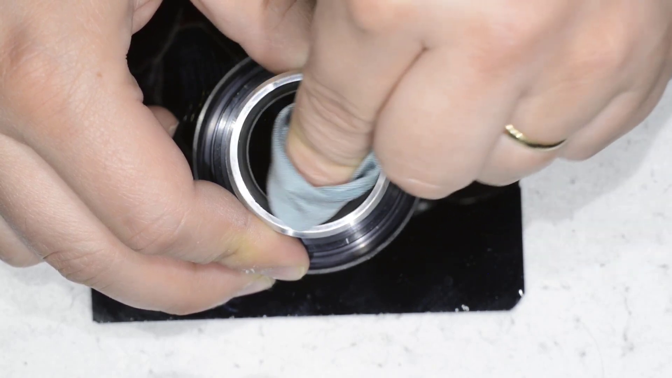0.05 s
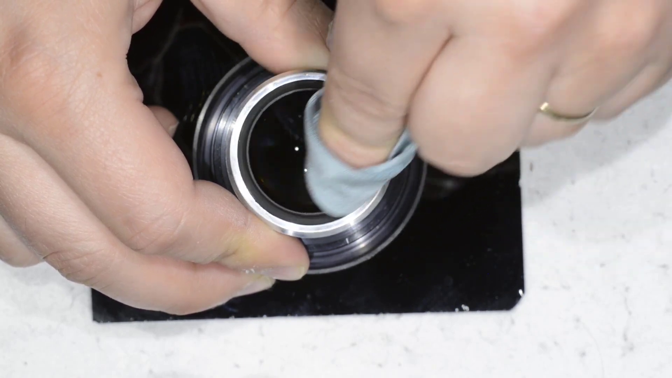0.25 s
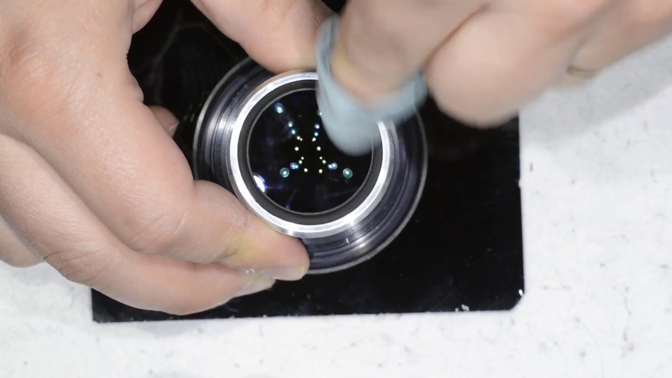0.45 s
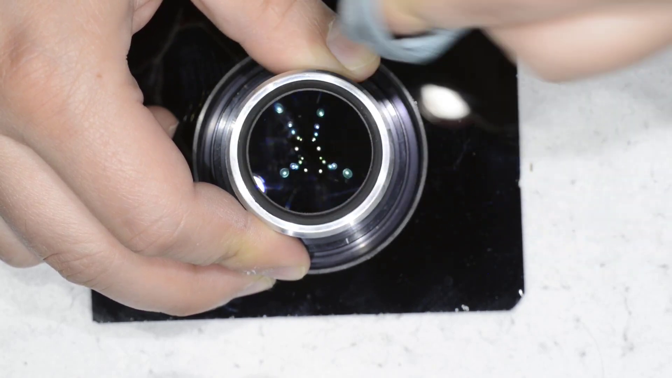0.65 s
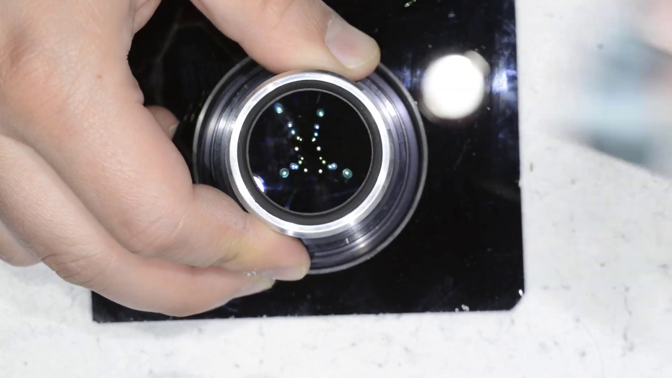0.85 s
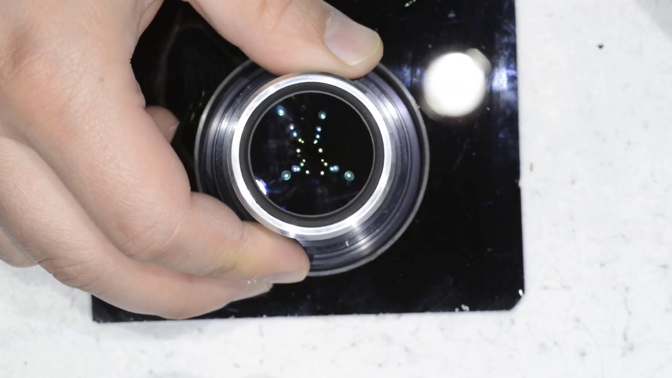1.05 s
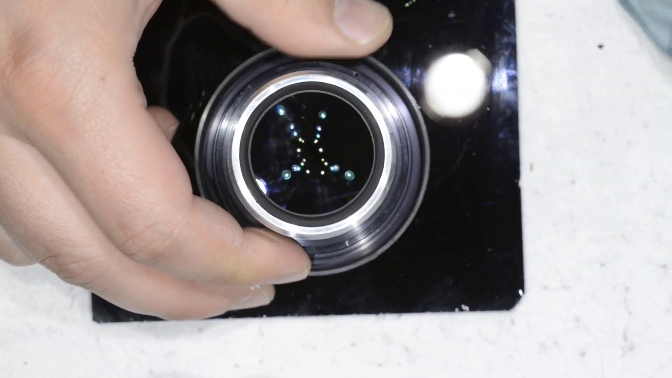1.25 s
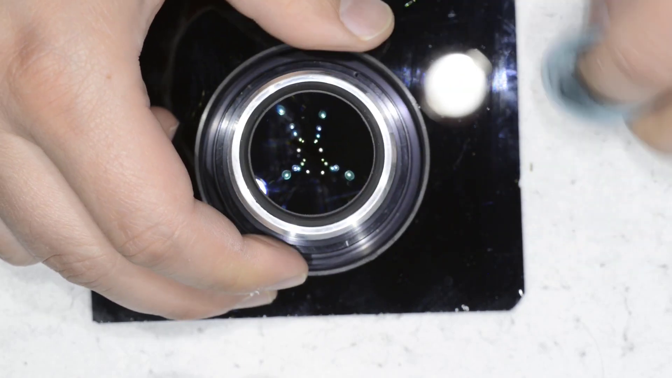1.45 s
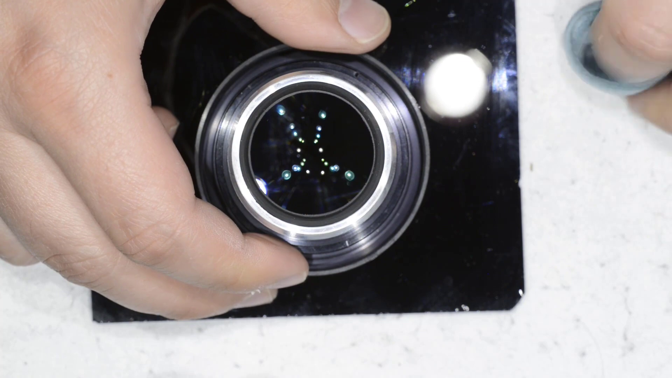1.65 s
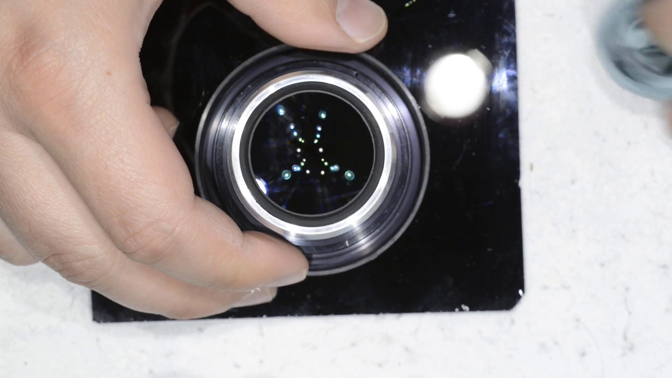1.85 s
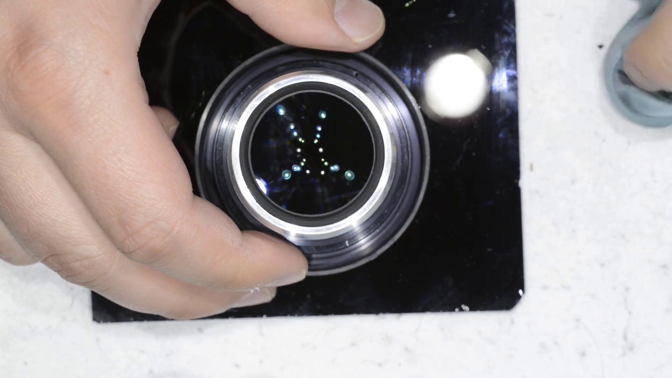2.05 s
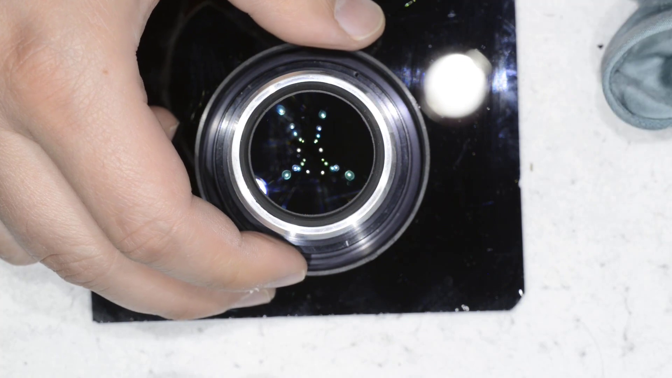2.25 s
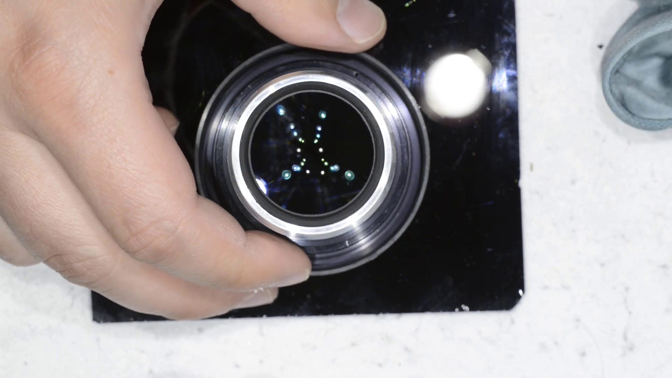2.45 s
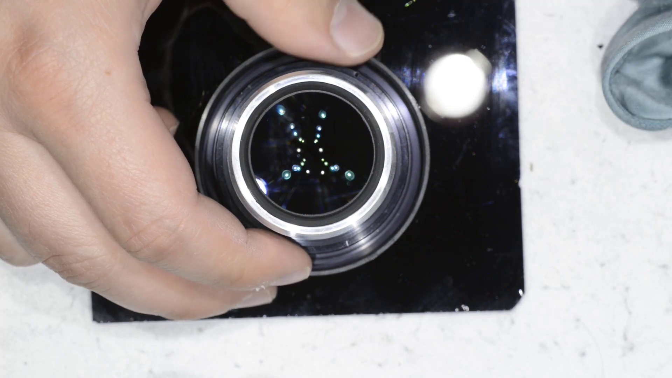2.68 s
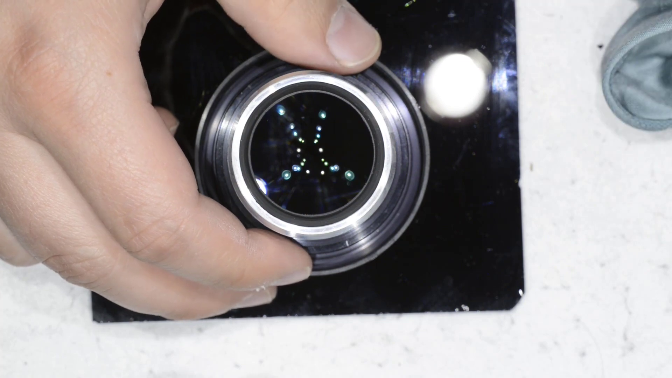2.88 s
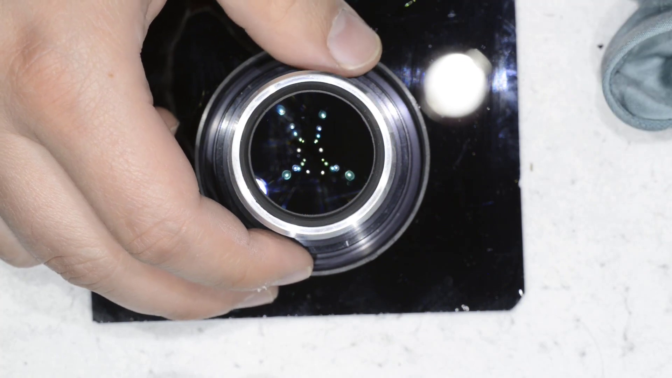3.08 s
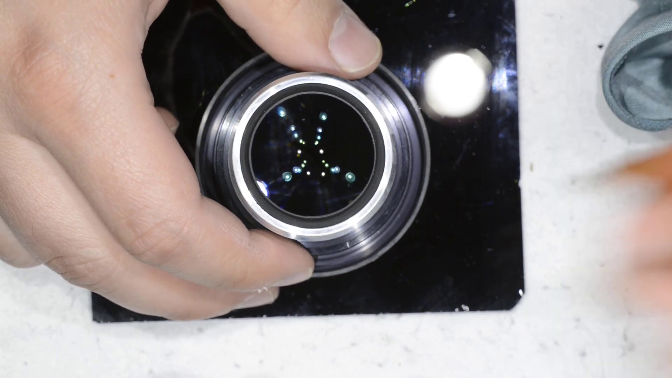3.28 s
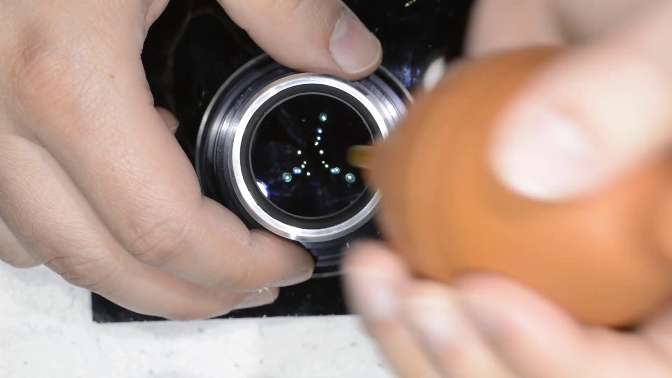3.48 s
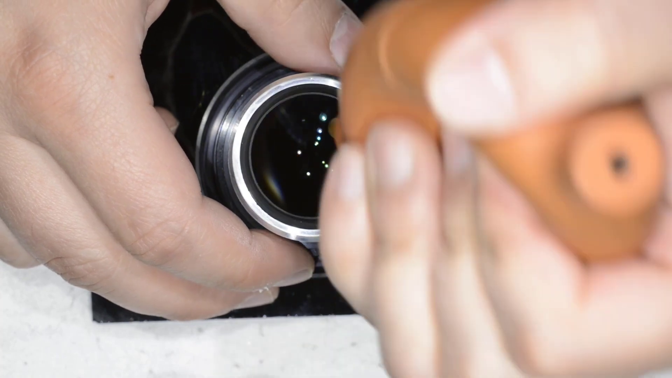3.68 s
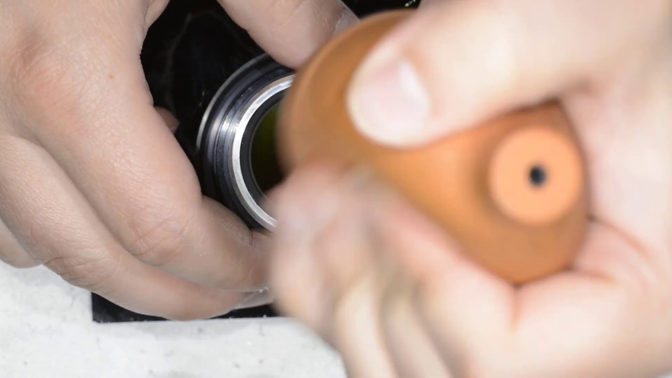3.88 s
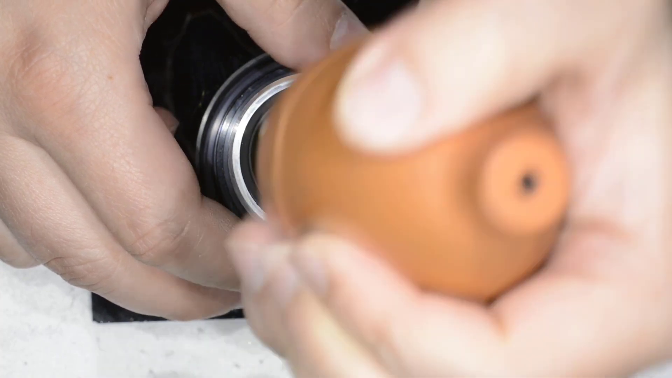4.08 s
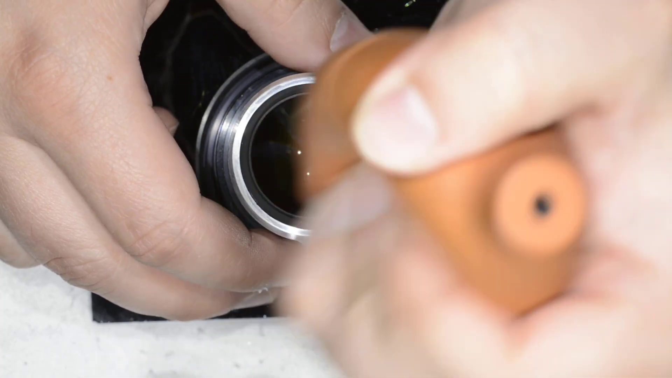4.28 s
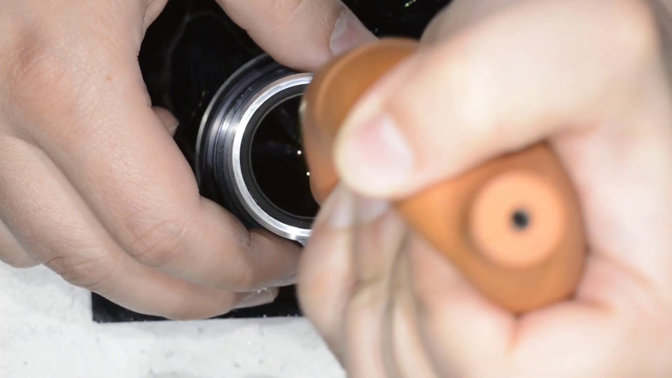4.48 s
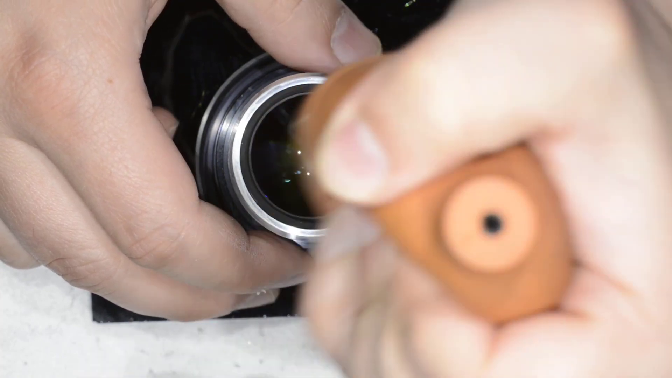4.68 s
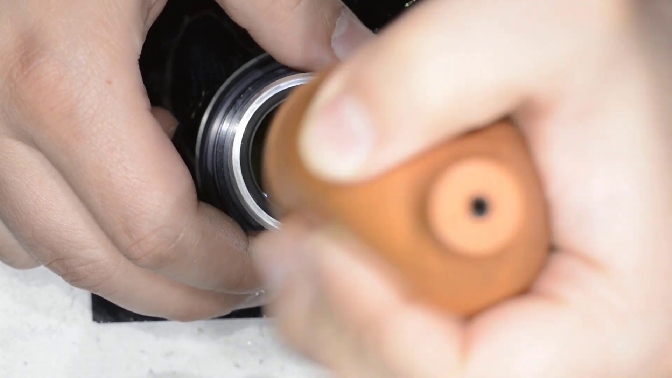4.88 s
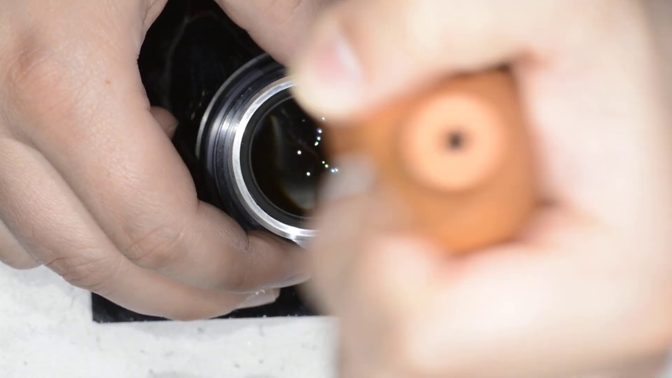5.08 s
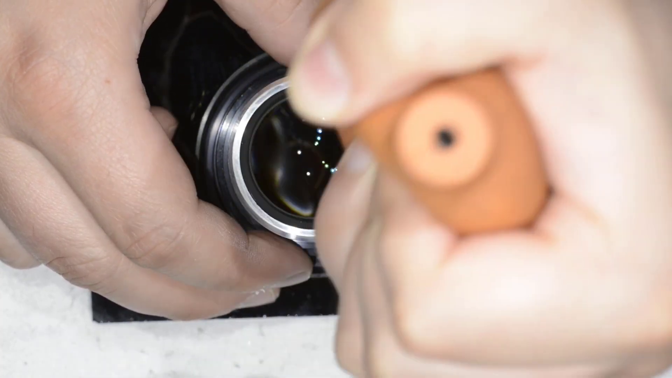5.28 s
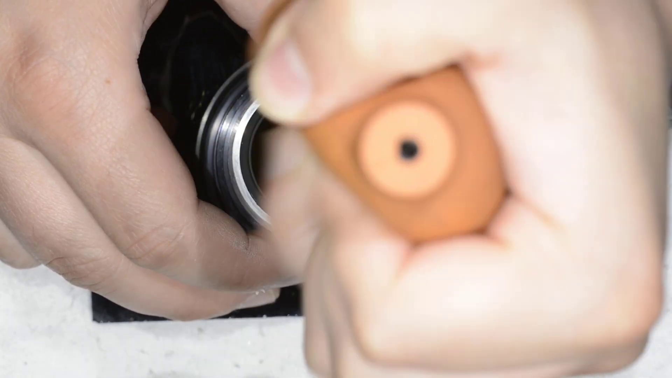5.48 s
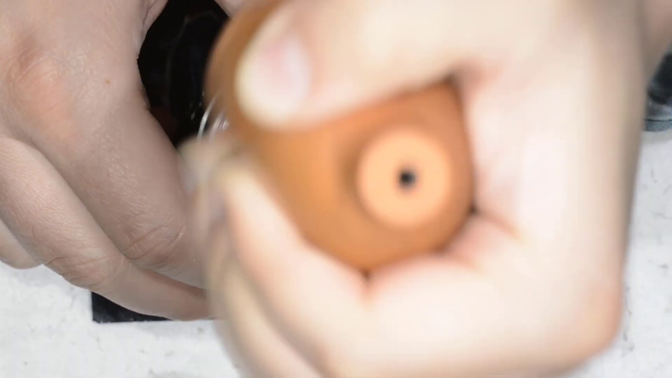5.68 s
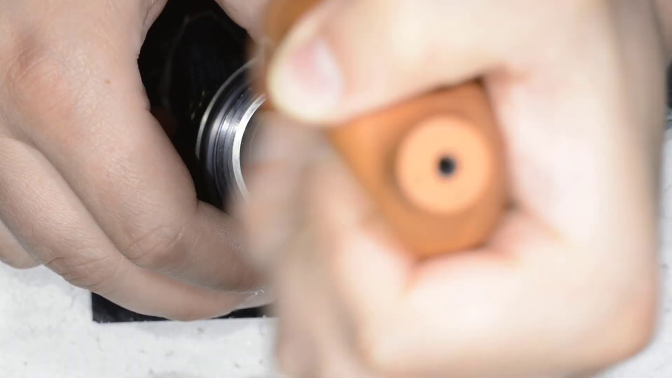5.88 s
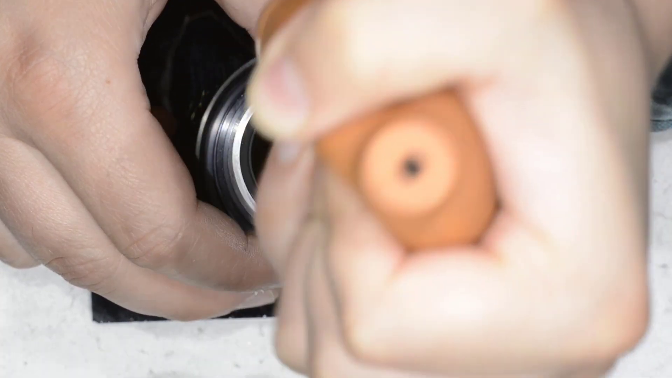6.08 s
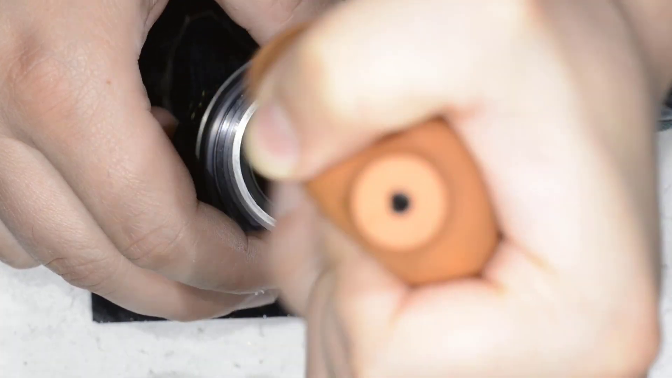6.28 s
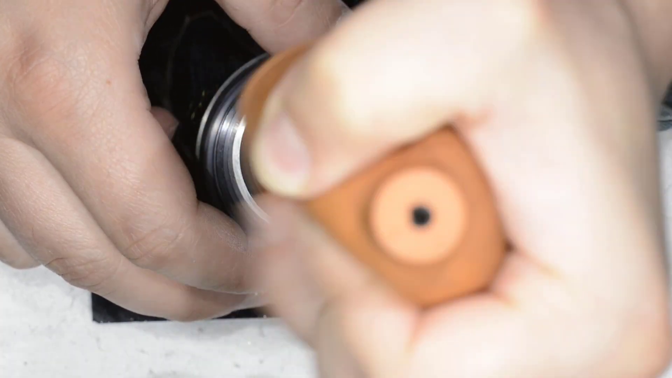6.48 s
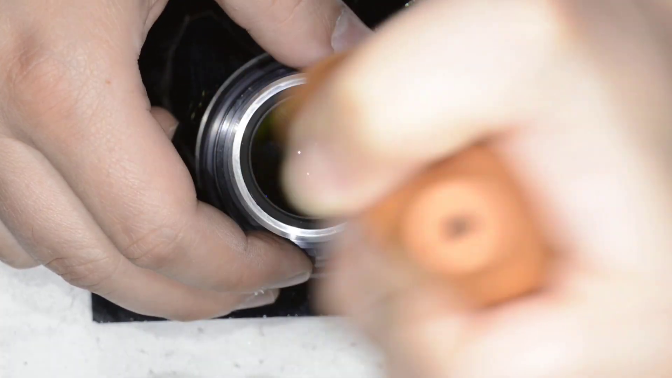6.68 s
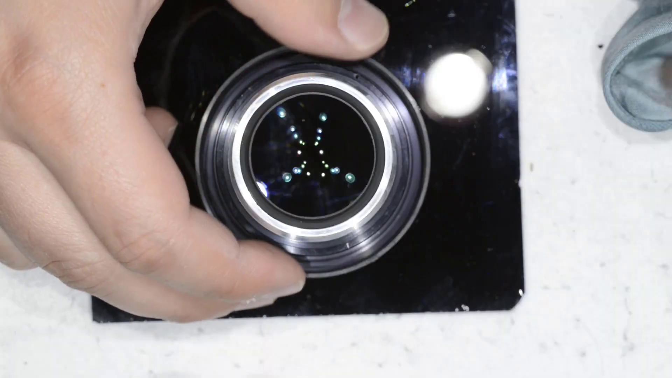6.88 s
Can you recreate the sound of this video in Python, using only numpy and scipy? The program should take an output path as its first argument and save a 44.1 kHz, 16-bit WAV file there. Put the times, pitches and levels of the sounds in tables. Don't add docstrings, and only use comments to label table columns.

```python
import sys
import numpy as np
from scipy import signal
from scipy.fft import rfft, irfft, next_fast_len
from scipy.io import wavfile
from scipy.ndimage import uniform_filter1d, map_coordinates

SR = 44100
rng = np.random.default_rng(int(sys.argv[2]) if len(sys.argv) > 2 else 0)


def ratio(d):
    e = np.asarray(d, float) / 20
    return 10 ** e


def dump_mix(stems):
    frames = np.atleast_2d(stems).T
    limited = np.clip(frames, -1, 1)
    pcm = np.round(limited * 32767).astype(np.int16)
    wavfile.write(sys.argv[1], SR, pcm)


N = 306362
T = np.arange(N) / SR
TOP_HZ = 15980

# frequency in Hz, density in dB per Hz.
HISS_SPECTRUM = [(21, -33), (36, -9.5), (95, -6), (139, -9.5), (243, -10), (509, -14), (640, -12.5),
                 (709, -15.5), (1450, -17.5), (1640, -19), (8390, -25), (14000, -26.5), (15900, -27.5)]
# frequency in Hz, likeness 0-1, left lead in rad, left over right in dB.
HISS_PORTS = [(60, 0.64, 0, 1), (300, 0.57, 0, -2), (1000, 0.54, 0, -4.5), (3000, 0.37, 0, -1.5),
              (15000, 0.35, 0, 3)]
# multiple of the frame rate, level in dB, left over right in dB, left lead in rad.
FRAME_HUM = [(1, -51, 11, -0.51), (2, -57.5, 2, -.3), (3, -55, 4, -0.35), (4, -74, 2, 0), (5, -66.5, -2, 0),
             (6, -63, 6.5, 0)]
# frequency in Hz, level in dB.
MAINS_LINES = [(250, -69.5), (300, -71), (350, -71), (450, -70.5), (650, -76.5)]

# start in seconds, peak level in dB, knock relative to it in dB,
# frequency in Hz of a ping heard only where the ring is above -20 dB, ring relative to the peak level in dB.
TICKS = [(1.209, -36.5, -14, 4530, -30), (1.349, -48, -17, 5740, -30), (1.9185, -33, -16, 5000, -28),
         (2.436, -49.5, 7, 2400, -30), (2.4556, -36, -5, 5000, -25), (2.4728, -27, -18, 4300, -8),
         (2.4914, -37.5, -8, 2500, -15), (2.6399, -38, -9, 6520, -13), (2.8477, -41, -7, 2400, -30),
         (2.87, -30, -14, 5930, -24), (2.8967, -28.5, -13.5, 2600, -11), (2.8975, -32, -20, 6460, -16),
         (3.606, -24, -28, 5400, -32)]
# frequency in Hz, level in dB, decay by 60 dB in seconds.
METAL_MODES = [(2500, 0, 0.045), (4140, -16, 0.047), (5200, -16, 0.034), (6420, -1.5, 0.045)]
# peak in seconds, level in dB, rise in seconds, fall in seconds.
RUBS = [
    (3.346, -53, 0.06, .03),
    (3.473, -43.5, 0.041, 0.037),
    (3.612, -70, .03, .015),
    (3.636, -52, 0.011, .012),
]
# frequency in Hz, density in dB per Hz.
SKIN_SPECTRUM = [(1500, -40), (2600, -13), (3600, -4), (4300, -4), (7500, -8), (9500, -18), (15000, -35)]

VALVE_SHUTS = [3.911, 4.1757, 4.4359, 4.6942, 4.9516, 5.2395, 5.5085, 5.778, 6.035, 6.2893, 6.5267, 6.719]
# thud in dB, crack in dB.
VALVE_SNAPS = [(-25.5, -41), (-20, -30), (-17.5, -23), (-17, -16.5), (-14, -16.5), (-11, -19.5),
               (-13.5, -16.5), (-21, -17), (-14.5, -15.5), (-13.5, -16), (-16, -14), (-18.5, -18)]
# time in seconds, level in dB.
VALVE_OPENS = [(3.786, -38), (4.066, -37), (4.328, -34.5), (4.588, -36), (4.841, -36.5), (5.116, -44),
               (5.394, -42), (5.663, -40.5), (5.923, -39), (6.182, -39), (6.429, -36.5), (6.653, -36.5)]
# frequency in Hz, width in Hz, level in dB.
BULB_MODES = [(293, 380, -6), (914, 170, 3.5), (1260, 390, -7.5), (2600, 600, -14)]

# hiss in dB, fall in dB as the bulb fills.
REFILLS = [(-27, -15), (-25, -9.5), (-25.5, -6.5), (-25.5, -6), (-25.5, -7), (-28, -2.5), (-26.5, -3.5),
           (-25.5, -5.5), (-25.5, -9.5), (-26, -3), (-24, -8), (-24.5, -9), (-28, -1.5)]
# frequency in Hz, density in dB per Hz.
INTAKE_SPECTRUM = [(290, -24), (500, -19), (649, -35), (818, -15), (1060, -14), (1690, -13.5), (2960, -6),
                   (3840, -8), (5280, -1.5), (8150, -8.5), (10600, -5.5), (13300, -9.5), (15900, -14.5)]
# frequency in Hz, width in Hz, level in dB.
VALVE_PEAKS = [(2900, 250, 0.5), (5750, 1200, 4), (7170, 250, 4.5), (9270, 290, 5), (10400, 500, 6),
               (13700, 900, -7)]
# frequency in Hz, likeness 0-1, left lead in rad, left over right in dB.
VALVE_PORTS = [(300, .7, 0, 1), (1500, .85, .1, 1), (3800, .8, .2, 1), (4500, .8, 1, 4),
               (6800, .75, 1.8, 5), (8200, .65, 2.3, 0), (10000, .65, 2.9, 3), (12000, .5, 3.6, 4),
               (15500, .55, 3.3, 4)]

# start in seconds, end in seconds.
STROKES = [(3.633, 3.794), (3.917, 4.072), (4.18, 4.335), (4.44, 4.597), (4.699, 4.848), (4.958, 5.123),
           (5.246, 5.394), (5.512, 5.669), (5.78, 5.93), (6.037, 6.191), (6.292, 6.436), (6.531, 6.66),
           (6.728, 6.836)]
# jet in dB, peak as share of the stroke, then in dB relative to the jet
SQUEEZES = [(-21.5, 0.51, -14, -6.5, -15.5), (-20.5, 0.48, -18.5, -7, -9), (-20.5, 0.36, -15.5, -6.5, -7),
            (-24, 0.31, -9.5, -4, -2.5), (-17.5, 0.38, -18, -9.5, -7), (-14.5, 0.3, -31, -12.5, -10.5),
            (-17.5, 0.3, -24.5, -9.5, -3), (-17, 0.22, -22, -12, -7.5), (-17.5, 0.26, -15, -13, -11),
            (-18.5, 0.28, -13.5, -12.5, -7), (-25, 0.21, -6.5, -2, -3.5), (-24.5, 0.3, -7.5, -4, -7.5),
            (-20.5, 0.56, -18.5, -4.5, -13)]
# frequency in Hz, density in dB per Hz.
JET_SPECTRUM = [(200, -28), (400, -22), (740, -17.5), (820, -12.5), (1150, -17), (1800, -12.5),
                (3020, -3.5), (4200, -8.5), (6060, 0), (6800, -4.5), (8030, -3.5), (8720, -9.5),
                (14100, -3), (15900, -10.5)]
# frequency in Hz, width in Hz, level in dB.
NOZZLE_PEAKS = [(2170, 620, 2), (2900, 350, 0), (5340, 280, 5), (6060, 360, 3.5), (7740, 300, 3),
                (10850, 950, 3.5)]
# frequency in Hz, width in Hz, level in dB.
MOUNT_PEAK = [(1380, 170, 13)]
# frequency in Hz, likeness 0-1, left lead in rad, left over right in dB.
JET_PORTS = [(300, .85, 0, 1), (1500, .93, 0, 0), (2500, .85, .1, 1), (3800, .9, .1, 1), (4700, .8, .8, 4),
             (6800, .8, .8, 4), (7600, .8, .4, 1), (8600, .78, 1.7, 2), (12000, .75, 1.5, 3),
             (15500, .5, 1.5, 0)]


def unit(x):
    return x / np.sqrt(np.mean(x ** 2) + 1e-20)


def along(points, hz):
    f, *cols = np.transpose(points)
    return [np.interp(np.log(hz + 1), np.log(f + 1), c) for c in cols]


def filtered(x, response):
    m = next_fast_len(N + 8192)
    hz = np.fft.rfftfreq(m, 1 / SR)
    return irfft(rfft(x, m) * response(hz), m)[..., :N]


def resonances(modes):
    return lambda f: sum(ratio(db) * 1j * f * w / (c * c - f * f + 1j * f * w) for c, w, db in modes)


def arch(start_s, peak_s, end_s, rise, fall):
    up = np.clip((T - start_s) / (peak_s - start_s), 0, 1)
    down = np.clip((end_s - T) / (end_s - peak_s), 0, 1)
    return np.sin(np.pi / 2 * up) ** rise * np.sin(np.pi / 2 * down) ** fall


def flutter(rate_hz, db):
    coarse = T[::32]
    points = rng.standard_normal(int(N * rate_hz / SR) + 4)
    wander = map_coordinates(points, [coarse * rate_hz])
    return ratio(db * np.interp(T, coarse, wander))


def rush(spectrum, ports, peaks=(), edges_hz=(), patchy_db=0, wide=3, long=10):
    z = signal.stft(rng.standard_normal((2, N)), nperseg=512)[2]
    field = uniform_filter1d(rng.standard_normal(z.shape[1:]), round(wide), 0)
    field = uniform_filter1d(field, round(long), 1)
    patchy = signal.istft(z * ratio(patchy_db * unit(field)), nperseg=512)[1][:, :N]
    m = next_fast_len(N)
    a, b = rfft(patchy, m)
    hz = np.fft.rfftfreq(m, 1 / SR)

    alike, lead, pan_db = along(ports, hz)
    turn = np.arccos(np.clip(alike, 0, .99)) / 2
    bumps = sum(db / (1 + (2 * (hz - c) / w) ** 2) for c, w, db in peaks)
    mean_power = 1 + 2 * np.cos(turn) ** 2 * np.cos(lead) - np.cos(lead)
    gain = ratio(along(spectrum, hz)[0] + bumps) / np.sqrt(mean_power)
    sign = np.array([[1], [-1]])
    mixed = np.cos(turn) * a + sign * np.sin(turn) * b
    both = gain * ratio(sign * pan_db / 2) * np.exp(.5j * sign * lead) * mixed

    below = [0 * hz] + [1 / (1 + (hz / edge) ** 12) for edge in edges_hz] + [1 + 0 * hz]
    parts = [irfft(both * np.sqrt(np.abs(hi - lo)), m)[:, :N] for lo, hi in zip(below, below[1:])]
    return [part / np.std(part.mean(0)) for part in parts]


def camera():
    frame_hz = 29.97
    half = np.array([[.5], [-.5]])
    hum = mains = 0
    for k, db, pan_db, lead in FRAME_HUM:
        phase = 2 * np.pi * k * frame_hz * (T - .0267) + half * lead
        hum = hum + ratio(db - 0.5 + half * pan_db) * flutter(7.3, 0.66) * np.cos(phase)
    for hz, db in MAINS_LINES:
        mains = mains + ratio(db + 4.0) * flutter(9.8, 1.8) * np.sin(2 * np.pi * hz * T)
    hiss = ratio(-49) * rush(HISS_SPECTRUM, HISS_PORTS, patchy_db=0.1)[0]
    return hum + mains + hiss


def room(x):
    t = np.arange(SR // 3) / SR
    shared, *own = rng.standard_normal((3, len(t))) * ratio(-60 * t / 0.13)
    tail = shared + 0.3 * np.array(own)
    return signal.fftconvolve(x, tail / np.linalg.norm(tail[0]), axes=1)[:, :N]


def handling():
    ring, grit, knock = np.zeros((3, N + SR))
    t = np.arange(SR // 12) / SR
    for s, db, knock_db, top_hz, ring_db in TICKS:
        span = slice(round(s * SR), round(s * SR) + len(t))
        dust = rng.standard_normal((2, len(t)))
        metal = sum(ratio(level + rng.normal(0, 1.1) - 60 * t / t60) * np.sin(2 * np.pi * hz * t)
                    for hz, level, t60 in METAL_MODES)
        wobble = .4 * np.cumsum(dust[1]) / np.sqrt(SR / 300)
        own = ratio(-60 * t / .035) * np.sin(2 * np.pi * top_hz * t + wobble)
        ring[span] += ratio(db + ring_db) * metal
        if ring_db > -20:
            ring[span] += ratio(db - 7.5) * own
        grit[span] += ratio(db - 8.0 - 60 * t / 0.075) * dust[0]
        knock[span] += ratio(db + knock_db + 13 - 60 * t / 0.075) * dust[1]
    scrape = filtered(grit[:N], lambda hz: resonances([(4500, 6000, 0)])(hz) ** 2)
    table = filtered(knock[:N], resonances([(784, 520, 0)]))
    ticks = ring[:N] + scrape + table

    slide = sum(ratio(db) * arch(s - rise_s, s, s + fall_s, 2.3, 2.5) for s, db, rise_s, fall_s in RUBS)
    rub = slide * flutter(310, 1.2) * rush(SKIN_SPECTRUM, JET_PORTS)[0]
    return ticks * ratio([[1.2], [-1.2]]) + rub


def valve():
    thud, crack, pop = np.zeros((3, N))
    for s, (thud_db, crack_db) in zip(VALVE_SHUTS, VALVE_SNAPS):
        thud[round((s - .00065) * SR)] = ratio(thud_db + 24.0)
        crack[round(s * SR) - 1] = -ratio(crack_db + 28.5)
    for s, db in VALVE_OPENS:
        pop[round(s * SR)] = ratio(db + 30.5)
    body = filtered(thud, lambda hz: resonances(BULB_MODES)(hz) / (1 + 1j * hz / 2200) ** 2)
    body = body + filtered(pop, resonances([(230, 160, 6), (604, 580, -13)]))
    spike = filtered(crack, resonances([(1090, 630, -2.5), (2770, 1600, 0.0), (6460, 3400, -2)]))
    left = ratio(3.0) * body + ratio(1.5) * spike
    right = ratio(-1.2) * np.roll(body, 1) + ratio(-6) * np.roll(spike, 2)
    near = np.array([left, right])
    return near - ratio(-16) * np.roll(near, round(.0022 * SR), axis=1)


def refills():
    swell_s, early_s, full_s, cut_s = 0.031, 0.0092, 0.029, 0.0059
    low, high = np.zeros((2, N))
    for (_, end_s), shut_s, (db, fall_db) in zip(STROKES, [*VALVE_SHUTS, N / SR], REFILLS):
        swell = 1 - np.exp(-np.clip(T - end_s + early_s, 0, None) / swell_s)
        full = np.clip(1 - (shut_s - T) / full_s, 0, 1)
        hiss = ratio(db + fall_db * full) * np.clip((shut_s - T) / cut_s + 1, 0, 1)
        low += hiss * swell
        high += hiss * swell ** 1.74 * ratio(-0.5 - 4.5 * full)
    hush, whistle = rush(INTAKE_SPECTRUM, VALVE_PORTS, VALVE_PEAKS, edges_hz=(8300,),
                         patchy_db=2.0, wide=2, long=16)
    return flutter(90, 0.33) * (low * hush + high * whistle)


def puffs():
    core, note, wash, fizz = np.zeros((4, N))
    for (start_s, end_s), (db, peak, note_db, wash_db, fizz_db) in zip(STROKES, SQUEEZES):
        flow = arch(start_s, start_s + peak * (end_s - start_s), end_s, 1, 1.25)
        core += ratio(db) * flow
        note += ratio(db + note_db) * flow ** 0.32
        wash += ratio(db + wash_db) * flow ** 0.71
        fizz += ratio(db + fizz_db) * flow ** 1.34
    low, hollow, mid, high, top = rush(JET_SPECTRUM, JET_PORTS, [*MOUNT_PEAK, *NOZZLE_PEAKS],
                                       edges_hz=(1136, 1670, 4050, 8900), patchy_db=2.5, wide=3, long=14)
    below = ratio(-14.5) * wash * low + wash * mid
    jet = note * flutter(45, 0.83) * hollow + below + core * flutter(40, 0.84) * high + fizz * top
    return flutter(120, 0.4) * jet


def scene():
    near = puffs() + refills() + valve() + handling()
    power = np.abs(uniform_filter1d(np.mean(near ** 2, 0), 1500))
    over_db = np.clip(10 * np.log10(power + 1e-9) + 16.5, 0, None)
    release_db = 10 * T
    duck_db = 1.5 * (np.maximum.accumulate(over_db + release_db) - release_db)
    return near + ratio(-9.0) * room(near) + ratio(-duck_db) * camera()


def low_pass(x):
    return signal.sosfilt(signal.butter(12, 15980, fs=SR, output="sos"), x)


def record(dry):
    held = dry / (1 + np.abs(dry / 0.76) ** 6) ** (1 / 6)
    return low_pass(filtered(held, lambda hz: hz < TOP_HZ))


dry = scene()
out = record(dry)
dump_mix(out)
```